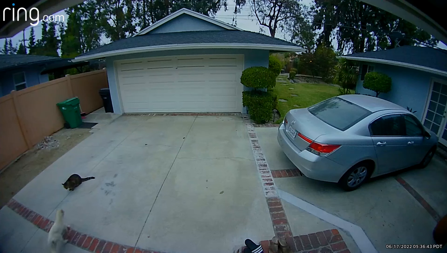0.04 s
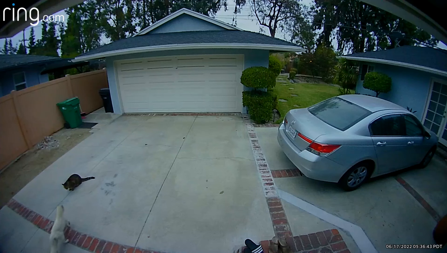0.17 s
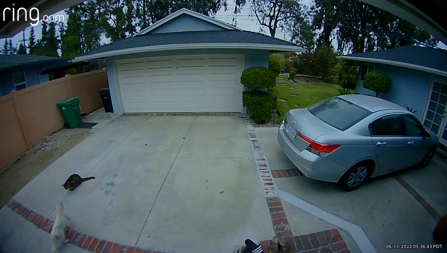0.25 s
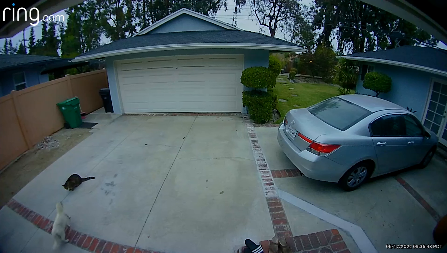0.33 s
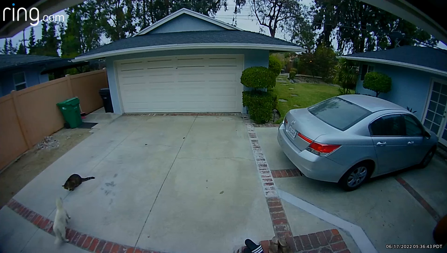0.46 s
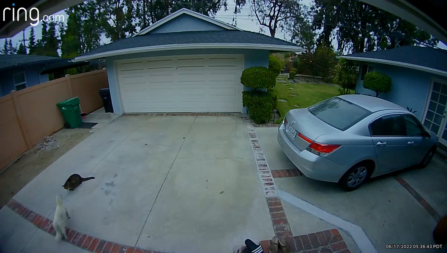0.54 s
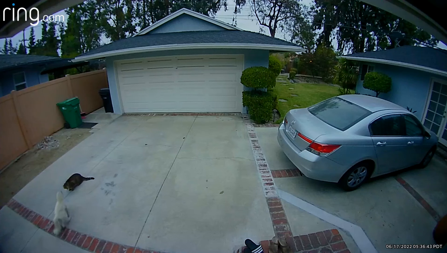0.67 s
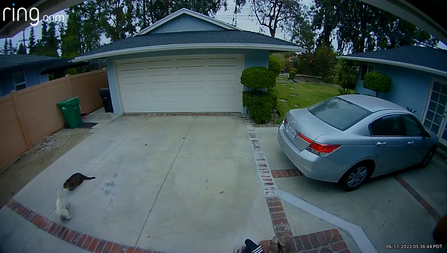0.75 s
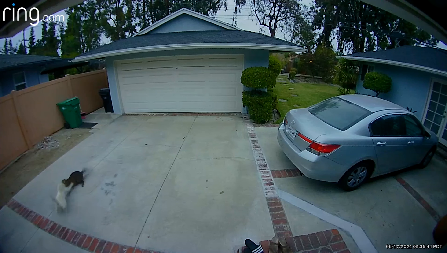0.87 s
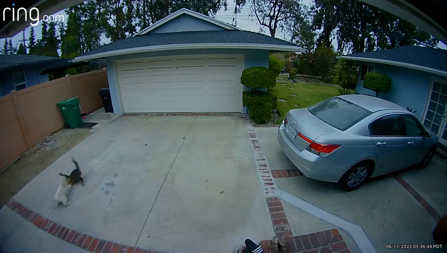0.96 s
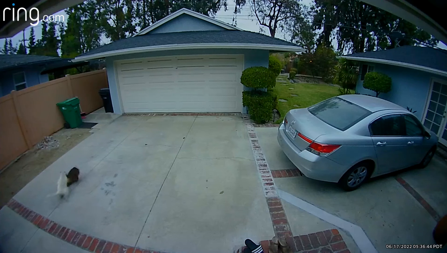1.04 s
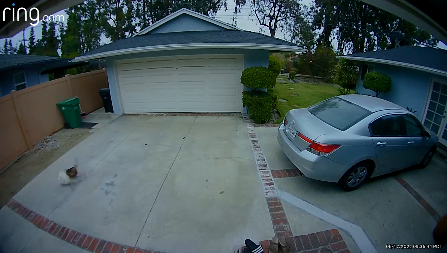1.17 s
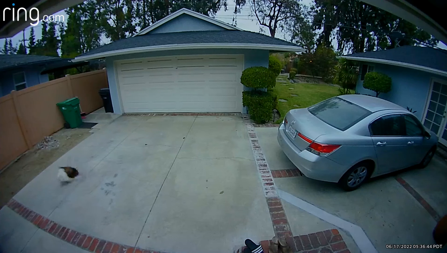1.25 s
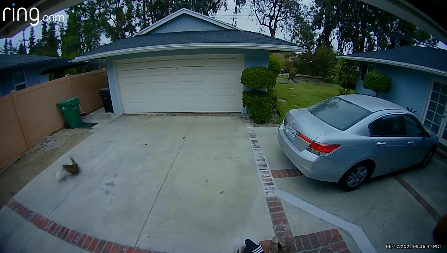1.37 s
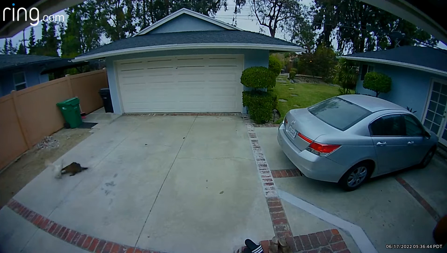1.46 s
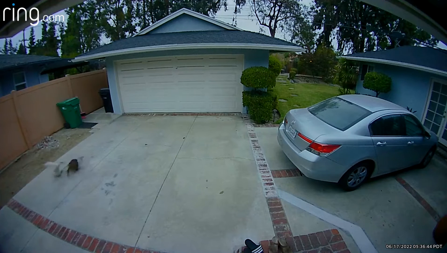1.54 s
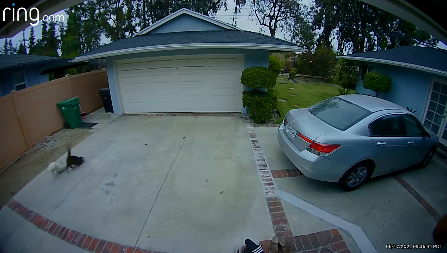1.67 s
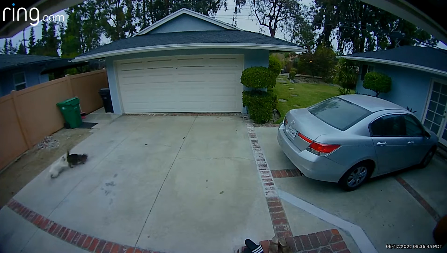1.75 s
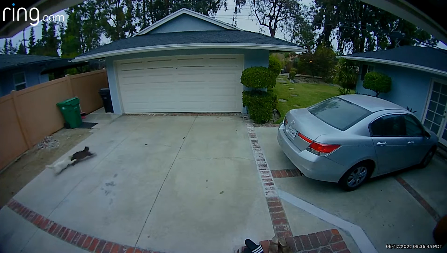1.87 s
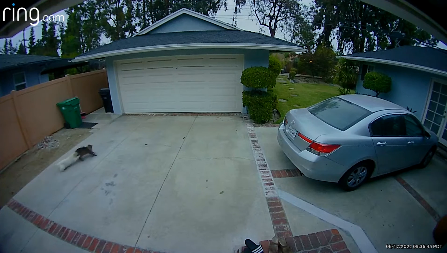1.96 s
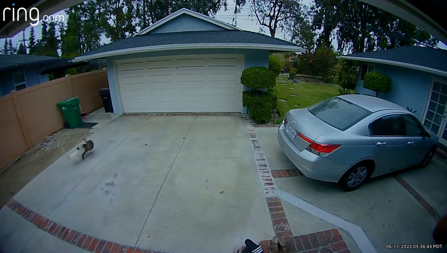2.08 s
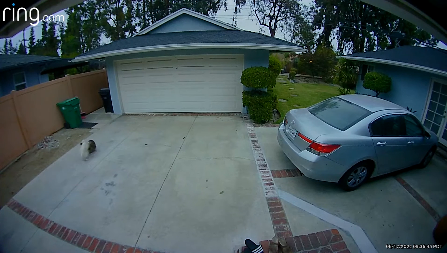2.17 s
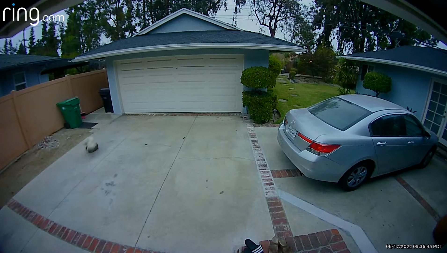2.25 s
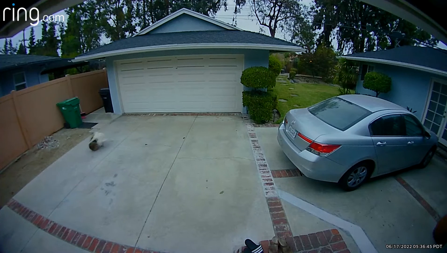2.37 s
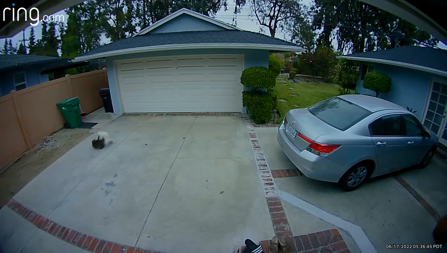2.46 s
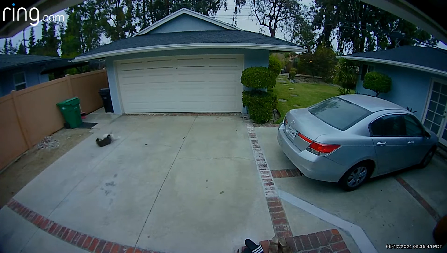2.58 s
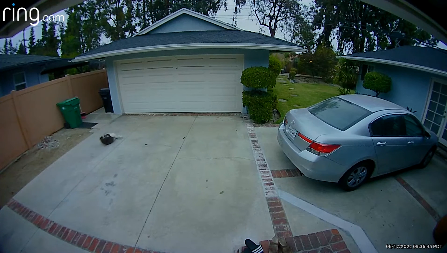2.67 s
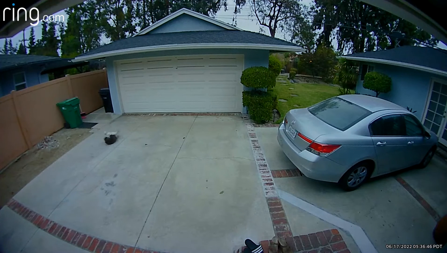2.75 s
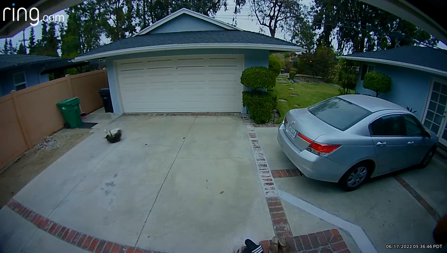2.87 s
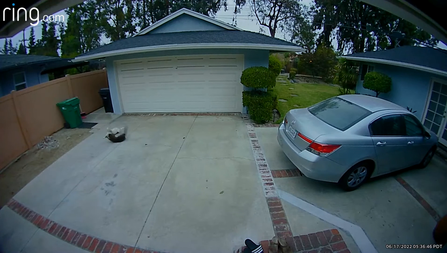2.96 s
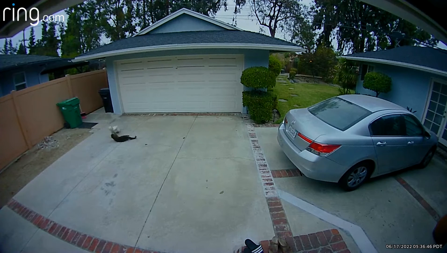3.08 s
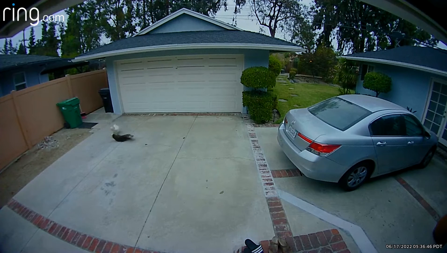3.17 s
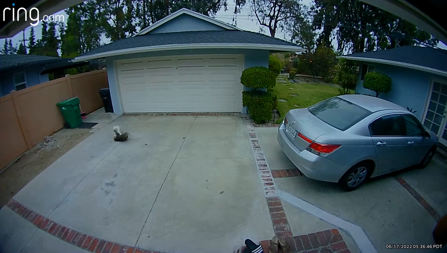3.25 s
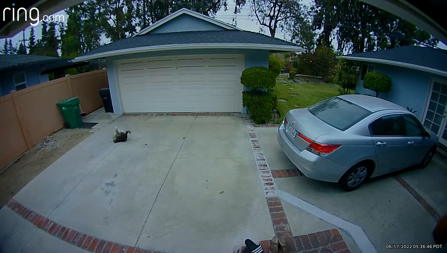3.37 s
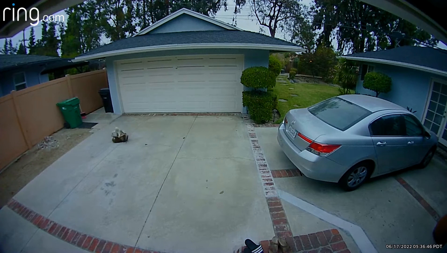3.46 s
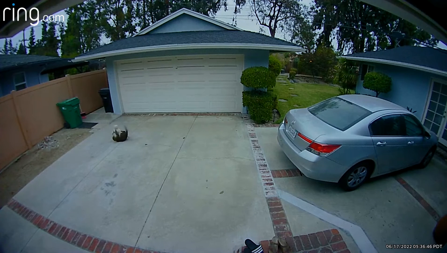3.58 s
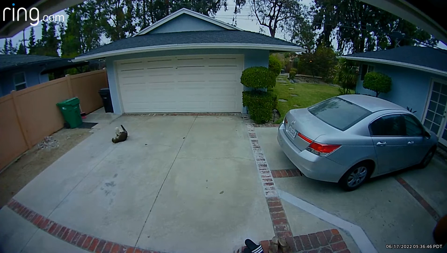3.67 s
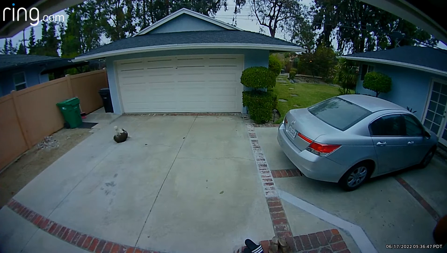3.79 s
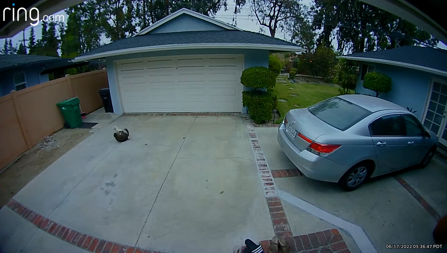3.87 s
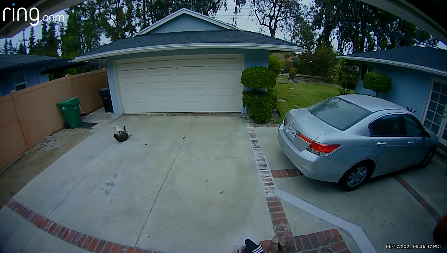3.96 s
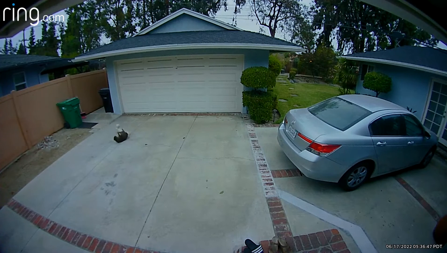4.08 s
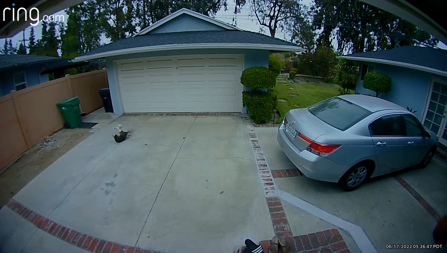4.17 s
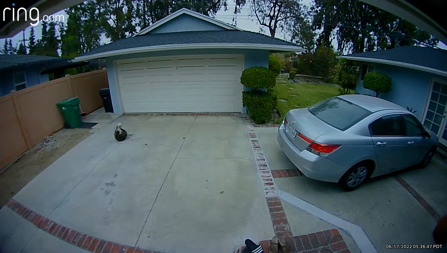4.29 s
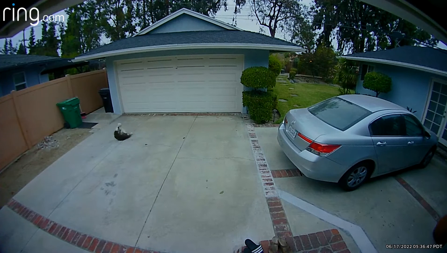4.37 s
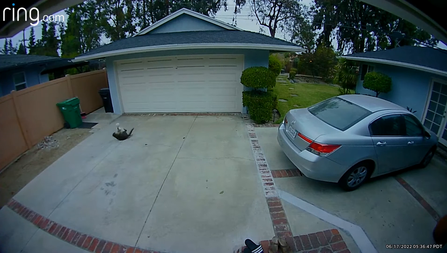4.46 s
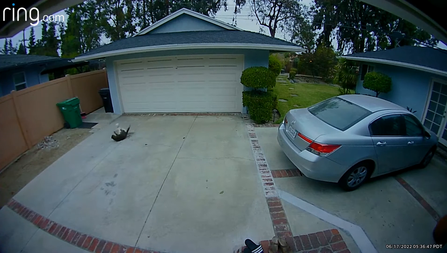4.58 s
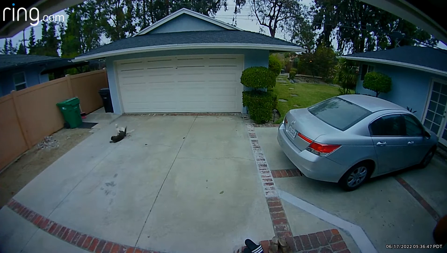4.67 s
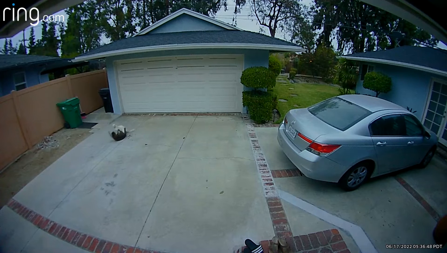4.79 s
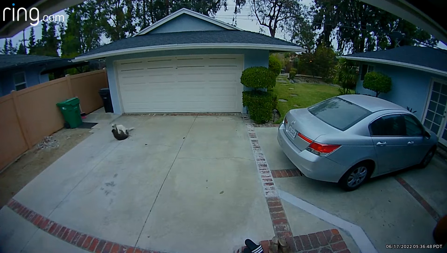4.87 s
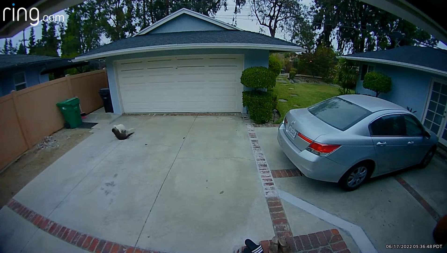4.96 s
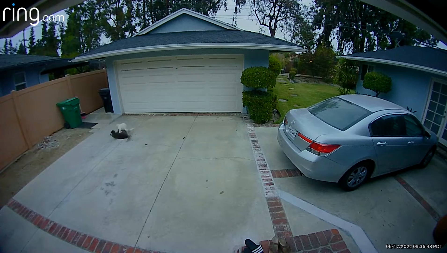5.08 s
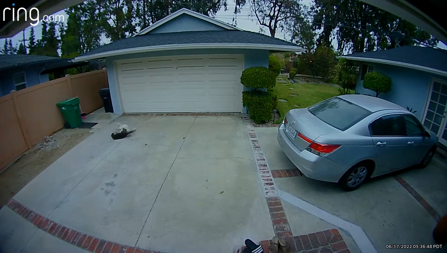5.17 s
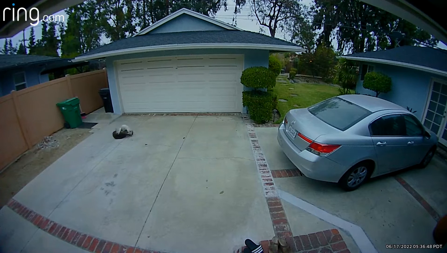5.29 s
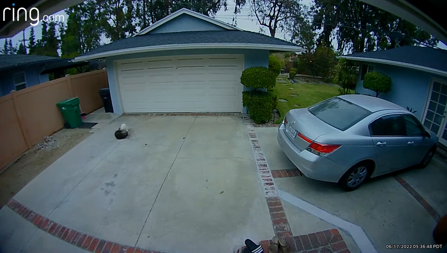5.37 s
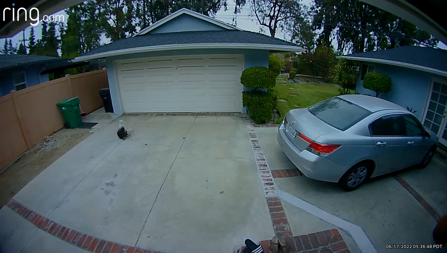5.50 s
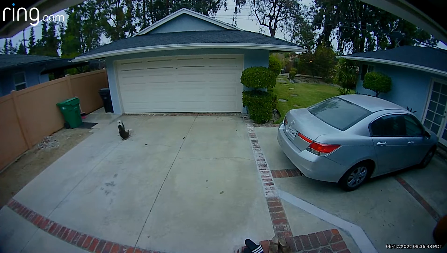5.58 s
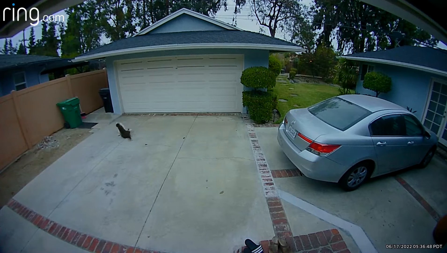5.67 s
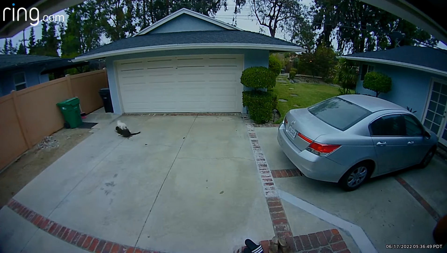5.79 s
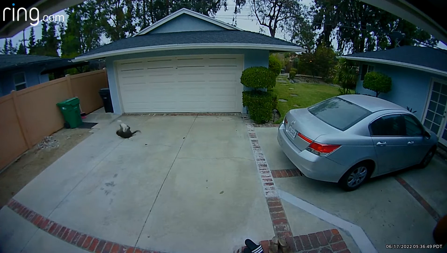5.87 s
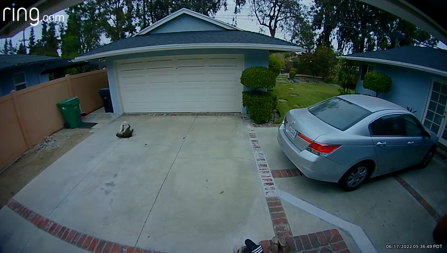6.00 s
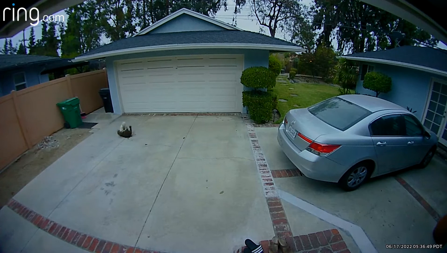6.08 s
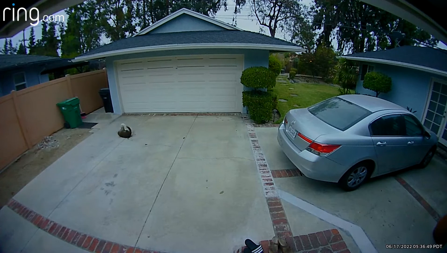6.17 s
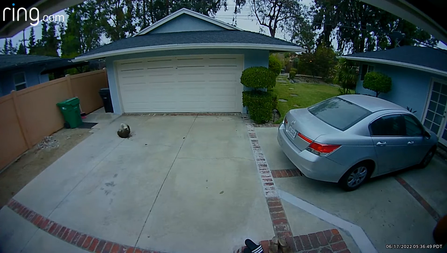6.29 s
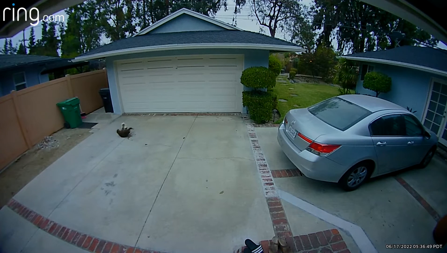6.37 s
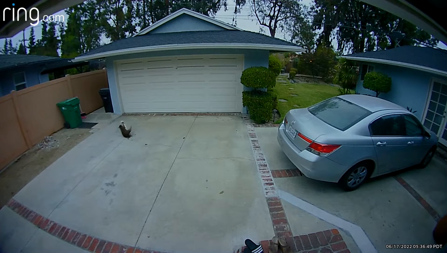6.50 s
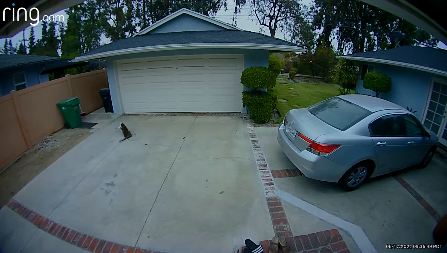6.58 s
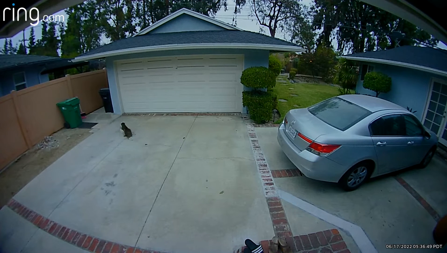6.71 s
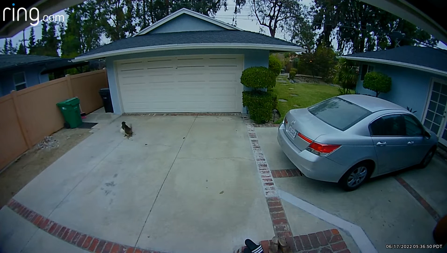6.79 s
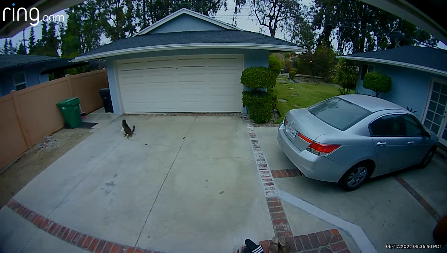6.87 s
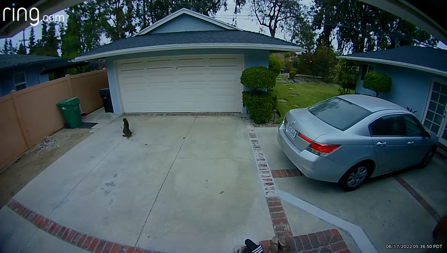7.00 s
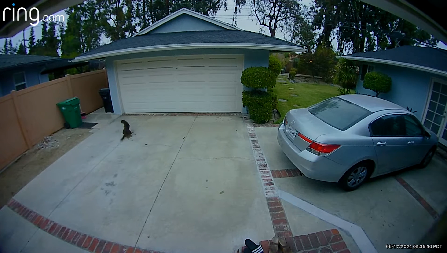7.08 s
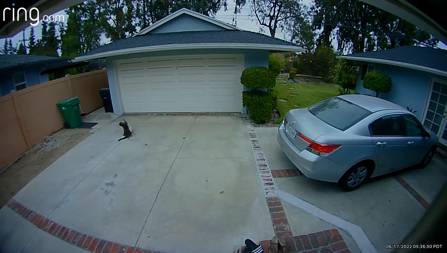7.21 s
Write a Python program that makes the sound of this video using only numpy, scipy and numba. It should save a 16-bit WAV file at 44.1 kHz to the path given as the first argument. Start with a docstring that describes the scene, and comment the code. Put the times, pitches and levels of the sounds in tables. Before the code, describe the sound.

Harsh, shrill screams from two fighting cats burst out in bouts outdoors, echoing off hard walls, with growls, claw scrapes and brief bird chips beforehand.

```python
"""Concrete driveway in front of a garage, heard by a security camera on the house: two cats fight.
A yowl climbs into a scream, a rival screams across it: rough pulse trains through throat resonances.
Snarls are short glides, hisses filtered noise, scuffles random scratches; a bird chips in falling sines.
Faint air, a thin tone, wall echoes; the microphone clips and the last bout crackles."""
import sys
import numpy as np
from scipy import signal
from scipy.fft import rfft, irfft, next_fast_len
from scipy.io import wavfile
from scipy.ndimage import uniform_filter1d, map_coordinates
from numba import njit

SR = 44100
rng = np.random.default_rng(int(sys.argv[2]) if len(sys.argv) > 2 else 0)


def generate_wav(signal):
    """Clip the signal to [-1, 1] and save it as 16-bit WAV at the path in sys.argv[1]."""
    frames = np.transpose(np.atleast_2d(signal))
    scaled = np.clip(frames, -1, 1) * 32767
    pcm = np.round(scaled).astype(np.int16)
    wavfile.write(sys.argv[1], SR, pcm)


N = 319283
TIME = np.arange(N) / SR

# leading cat's long cries: (start [s], end [s], attack [s], release [s], relative level [dB],
# open mouth resonance [Hz], mouth octaves per pitch octave, mouth closing [share/s],
# shrillness [dB], shrillness fall [dB/s])
LONG_CRIES = [(0.408, 0.692, 0.28, .02, -15, 2660, 0.51, 0, -16.5, -9),
              (0.665, 1.567, 0.041, .035, -10.5, 2540, 0.25, .1, 3.5, 20),
              (2.306, 3.483, 0.024, 0.09, -9, 2488, 0.97, 0.16, -9.5, 4),
              (3.742, 4.688, 0.037, 0.083, -6.5, 2197, 1.1, 0.01, -14, -2),
              (6.414, 7.3, 0.022, .03, -14.5, 2304, 1, .08, -13, 8)]
# its short snarls and moans, one glide each: (start [s], end [s], attack [s], release [s],
# relative level [dB], first pitch [Hz], last pitch [Hz], roughness [0-1])
SNARL_GLIDES = [(1.563, 1.632, 0.025, .03, -7.5, 830, 790, 0.52),
                (1.656, 1.809, 0.014, .06, -10, 722, 785, .55),
                (2.281, 2.336, 0.022, .025, -3.5, 599.5, 718.8, 0.4),
                (3.683, 3.784, 0.048, 0.033, -9.5, 650.6, 790, .7),
                (4.663, 4.837, 0.031, 0.069, -10.5, 764, 793.7, 0.39),
                (5.244, 5.436, 0.09, 0.11, -9.5, 671.6, 787.5, .8),
                (5.854, 6.1, 0.06, 0.098, -8.5, 690.1, 1030, 0.71),
                (6.268, 6.428, 0.071, 0.015, -12.5, 593.3, 700, .55)]


def undb(db):
    """Decibels to gain."""
    return 10 ** (np.asarray(db) / 20)


def curves(table):
    """Each column of a table, joined by straight lines in time."""
    s, *columns = np.transpose(table)
    return [np.interp(TIME, s, column) for column in columns]


def unit(x):
    """Scale to rms 1."""
    return x / np.sqrt(np.mean(x ** 2))


def steady(x, span_s=0.018):
    """Hold the short-term rms near 1."""
    power = uniform_filter1d(x ** 2, int(span_s * SR))
    return x / np.sqrt(power + 1e-12)


def colour(x, points):
    """Filter by a spectrum of (frequency [Hz], gain [dB]) points, joined on a log-frequency axis."""
    hz, db = np.transpose(points)
    size = next_fast_len(N + 8192)
    bins_hz = np.maximum(np.fft.rfftfreq(size, 1 / SR), 1)
    gain = undb(np.interp(np.log(bins_hz), np.log(hz), db))
    return irfft(rfft(x, size) * gain, size)[:N]


def walk(rate_hz):
    """Smooth random curve with about rate_hz new values a second, rms 1."""
    coarse_s = TIME[::16]
    values = rng.standard_normal(len(coarse_s))
    curve = map_coordinates(values, [coarse_s * rate_hz], order=2, mode="wrap")
    return unit(np.interp(TIME, coarse_s, curve))


def envelope(start_s, end_s, attack_s, release_s, bend=1.19):
    """Attack, hold at 1, release; both ramps follow a power law."""
    ramps = np.minimum((TIME - start_s) / attack_s, (end_s - TIME) / release_s)
    return np.clip(ramps, 0, 1) ** bend


@njit
def svf(x, hz, width_hz):
    """State-variable band-pass whose centre and width move."""
    y, band_state, low_state = np.empty(len(x)), 0., 0.
    for i in range(len(x)):
        g, k = np.tan(np.pi * hz[i] / SR), width_hz[i] / hz[i]
        v = (band_state + g * (x[i] - low_state)) / (1 + g * (g + k))
        band_state = 2 * v - band_state
        low_state += 2 * g * v
        y[i] = k * v
    return y


def band(hz, width_hz, size):
    """Turbulent air: white noise through two equal resonances in series, rms 1."""
    centre, width = np.full(size, float(hz)), np.full(size, float(width_hz))
    once = svf(rng.standard_normal(size), centre, width)
    return unit(svf(once, centre, width))


def outdoor_air(level_db=-60.5):
    """Quiet outdoor air: coloured noise whose level wanders."""
    # air spectrum: (frequency [Hz], gain [dB])
    air_spectrum = [(30, -36.5), (130, -19), (250, -4), (450, -12), (1000, -12), (1400, -15.5), (4900, -19),
                    (5300, 0), (5800, 2), (6400, -9), (6900, -29.5), (9000, -46.5)]
    return unit(colour(rng.standard_normal(N), air_spectrum)) * undb(level_db + walk(10))


def thin_tone(hz=3490, level_db=-47, fade_s=0.031):
    """A faint sine with a wandering phase lingers in the lull after the third bout."""
    # extent of the tone: (start [s], end [s])
    tone_span = (4.93, 5.26)
    tone = np.sin(2 * np.pi * hz * TIME + walk(33))
    return undb(level_db) * envelope(*tone_span, fade_s, fade_s) * tone


def bird(length_s=0.022):
    """Bird chips: short sines that fall in pitch, with a quick attack."""
    # chips: (start [s], first pitch [Hz], fall in pitch [Hz], relative level [dB])
    chips = [(0, 5800, 83, -50), (0.108, 5560, 37, -54), (0.129, 5540, 160, -43.5),
             (0.279, 5920, 530, -35.5), (0.313, 5600, 19, -53.5), (.412, 5650, 40, -50),
             (0.432, 5970, 470, -34)]
    out, t = np.zeros(N), TIME[:int(length_s * SR)]
    shape = np.sin(np.pi * np.sqrt(t / length_s))
    for start_s, hz, fall_hz, db in chips:
        phase = 2 * np.pi * np.cumsum(hz - fall_hz * t / length_s) / SR
        out[max(int(start_s * SR), 0):][:len(t)] += undb(db) * np.sin(phase) * shape
    return out


def scuffle(rate_hz=140, level_db=-43, scrape_s=0.0049):
    """Claws and bodies on concrete: random scratches with decaying pressure drive coloured noise."""
    # fur and claws on concrete: (frequency [Hz], gain [dB])
    concrete = [(100, -37.5), (230, 0.5), (380, 1), (600, 2.5), (900, 0.5), (3200, -2), (4500, -15),
                (6000, -0.5), (7200, -35)]
    # spells of grappling: (start [s], end [s], vigour [dB])
    tussles = [(0.789, 1.301, 23.5), (1.22, 2.235, 3), (2.315, 3.567, 4), (3.681, 3.998, -7.5),
               (3.94, 5.159, 4), (5.276, 5.638, 12), (5.622, 6.22, 0), (6.24, 7.294, 4)]
    attack_s, release_s = 0.063, 0.093
    scratches = (rng.random(N) < rate_hz / SR) * rng.standard_normal(N)
    decay = np.exp(-TIME[:SR // 20] / scrape_s)
    pressure = signal.fftconvolve(scratches, decay)[:N]
    contact = colour(pressure * rng.standard_normal(N), concrete)
    vigour = sum(undb(db) * envelope(start_s, end_s, attack_s, release_s)
                 for start_s, end_s, db in tussles)
    return unit(contact) * undb(level_db) * vigour


def spits(rattle_db=-0.5, chest_db=-8):
    """Bursts of air: a rattling growl low in the throat, a rasp in the mouth, a hiss at the teeth."""
    # growling spits and hisses: (start [s], length [s], growl relative level [dB], growl [Hz],
    # rasp relative level [dB], rasp [Hz], hiss relative level [dB])
    bursts = [(1.877, 0.059, -38, 1480, -34, 3140, -42), (1.95, 0.067, -26.5, 1157, -30.5, 3190, -30),
              (2.094, 0.056, -17.5, 1409, -26.5, 2430, -23.5),
              (2.125, 0.042, -31, 1280, -22.5, 3065, -27.5),
              (2.175, 0.028, -35.5, 1306, -46.5, 2992, -29.5), (4.919, 0.096, -32, 1320, -31, 3435, -36),
              (4.965, 0.056, -22, 1220, -32, 3370, -33.5), (5.024, 0.057, -24, 1104, -34.5, 3350, -32),
              (5.326, 0.074, -37.5, 1446, -28, 2480, -28), (5.411, 0.098, -41, 1446, -33, 2640, -33),
              (5.495, 0.083, -43, 1290, -35.5, 2342, -35), (5.596, 0.085, -43, 1370, -39.5, 2370, -48),
              (5.705, 0.029, -39, 1242, -49.5, 2201, -57), (5.733, 0.057, -33, 1165, -40, 2210, -41),
              (6.283, 0.13, -17.5, 1153, -26, 2412, -55)]
    out, rattle = np.zeros(N), undb(rattle_db * (walk(180) - 2.5))
    for start_s, length_s, growl_db, growl_hz, rasp_db, rasp_hz, hiss_db in bursts:
        size = int(length_s * SR)
        growl = undb(growl_db) * band(growl_hz, 410, size)
        rasp = undb(rasp_db) * band(rasp_hz, 430, size)
        hiss = undb(hiss_db) * band(5913, 1400, size)
        chest = undb(chest_db + (growl_db + hiss_db) / 2) * band(310, 230, size)
        burst = (growl + rasp + hiss + chest) * signal.windows.tukey(size, .7)
        out[int(start_s * SR):][:size] += burst
    return out * rattle


def effort(hz, open_pitch_hz=965):
    """Octaves from the pitch at which the mouth is wide open: negative below it, 0 from there up."""
    return np.log2(np.minimum(hz / open_pitch_hz, 1))


def lead_controls(snarl_mouth_ratio=2.18, snarl_shrill_db=-14.5, shrill_db_per_octave=24):
    """Leading cat's pitch, roughness, mouth and shrillness: the mouth opens with effort, closes as it tires."""
    # courses of the long cries in turn: (time [s], pitch [Hz], roughness [0-1])
    yowl = [(0.412, 497, 0.07), (0.452, 527, 0.15), (.48, 612.1, .09), (0.519, 740, 0.04),
            (0.602, 695, .06), (0.68, 737, 0.02)]
    first_scream = [(0.687, 682.7, 0.096), (.76, 764, 0.2), (.80, 817.3, 0.22), (.84, 1014, .28),
                    (.95, 1147, 0.34), (0.999, 1268, .32), (1.09, 1286, 0.62), (1.22, 1328, 0.59),
                    (1.28, 1118, 0.494), (1.35, 1221, 0.39), (1.44, 913, 0.51), (1.551, 836, 0.53)]
    second_scream = [(2.345, 787.5, 0.89), (2.38, 987.5, 0.43), (2.44, 973, 0.43), (2.49, 1043, 0.39),
                     (2.54, 882.6, 0.184), (2.659, 1125, .33), (2.78, 926, .36), (2.849, 943.4, .27),
                     (2.93, 931, 0.36), (2.97, 844, 0.32), (3.04, 846, 0.26), (3.118, 913.4, 0.395),
                     (3.2, 851, 0.35), (3.35, 890.4, 0.29), (3.40, 760.7, 0.19), (3.46, 761.7, 0.23)]
    third_scream = [(3.8, 1150, 0.37), (3.86, 1212, 0.36), (3.94, 1126, 0.62), (4.04, 1110, 0.52),
                    (4.10, 1064, 0.36), (4.16, 955.7, 0.29), (4.25, 953.2, .45), (4.33, 889.4, 0.31),
                    (4.39, 797.6, .16), (4.479, 779, 0.232), (4.52, 857, 0.405), (4.591, 1093, .36),
                    (4.66, 1067, 0.45)]
    last_scream = [(6.441, 805.4, 0.14), (6.551, 784.7, .42), (6.662, 840.7, 0.44), (6.739, 772.7, .18),
                   (6.82, 794, 0.36), (6.92, 766.8, .2), (7.02, 804.8, 0.39), (7.101, 817, .14),
                   (7.18, 787.4, 0.3), (7.24, 847, 0.16)]
    courses = (yowl, first_scream, second_scream, third_scream, last_scream)
    points = []
    for cry, course in zip(LONG_CRIES, courses):
        start_s, *_, open_hz, follows, closing, shrill_db, dulling = cry
        for s, hz, rough in course:
            age_s = s - start_s
            mouth_hz = open_hz * 2 ** (follows * effort(hz)) * (1 - closing * age_s)
            points.append((s, hz, rough, mouth_hz, shrill_db - dulling * age_s))
    for start_s, end_s, *_, first_hz, last_hz, rough in SNARL_GLIDES:
        for s, hz in ((start_s, first_hz), (end_s, last_hz)):
            # a snarling mouth rings just above the second harmonic
            points.append((s, hz, rough, snarl_mouth_ratio * hz, snarl_shrill_db))
    hz, rough, mouth_hz, shrill_db = curves(sorted(points))
    return hz, rough, mouth_hz, shrill_db + shrill_db_per_octave * effort(hz)


def rival_controls(sag=.16, fade_s=0.047):
    """Rival's pitch and relative gain: each cry rises to its top and sinks by the share sag."""
    # the rival's arching cries: (start [s], end [s], top pitch [Hz], level against the lead [dB])
    rival_cries = [(.8, 1.42, 1031, -5), (1.4, 1.55, 859, 5), (1.64, 1.8, 527.7, 4.5),
                   (2.32, 2.48, 762, -1), (2.56, 2.8, 964.5, 1.5), (2.78, 3.4, 777.5, -7),
                   (3.9, 4.38, 816.8, 0.5), (4.48, 4.63, 838, 5.5), (5.28, 5.45, 638.7, -5.5),
                   (5.92, 6.14, 771.6, -12), (6.42, 6.68, 808.3, 5.5), (6.74, 7.12, 710.7, 2)]
    hz, gain = np.full(N, float(rival_cries[0][2])), 0
    for start_s, end_s, top_hz, db in rival_cries:
        from_middle = np.clip(2 * (TIME - start_s) / (end_s - start_s) - 1, -1, 1)
        hz = np.where(TIME > start_s, top_hz * (1 - sag * from_middle ** 2), hz)
        gain = gain + undb(db) * envelope(start_s, end_s, fade_s, fade_s)
    return hz, gain


def larynx(hz, rough, jitter=.05, quaver=.035, wobble=.03, flutter=0.67, doubling=0.85, rush=1.0,
           slope=0.27, tear_db=9):
    """Vocal folds: strain makes cycles uneven, tears harmonics, doubles the period, lets air rush through."""
    unevenness = jitter * walk(700) + quaver * walk(110) + wobble * walk(35)
    hz = hz * (1 + rough * unevenness)
    phase = 2 * np.pi * np.cumsum(hz) / SR
    tearing_db = tear_db * np.minimum(rough, .5)
    harmonics = sum(np.sin(k * phase) / k ** slope * undb(tearing_db * walk(45)) for k in range(1, 10))
    pulses = steady(harmonics)
    strong_weak = 1 + doubling * rough * (1 + walk(25)) * np.cos(phase / 2)
    air = rng.standard_normal(N) * (1 + np.cos(phase))
    return (pulses * strong_weak + rush * rough * air) * (1 + flutter * rough * walk(320))


def voice(hz, rough, mouth_hz, shrill_db, narrow_hz=400, damping_hz=1700, leak=0.0027, strain_leak=0.16):
    """A clean cry rings one sharp mouth resonance; strain widens it, and force adds a shrill top."""
    # wide open throat: (frequency [Hz], gain [dB])
    throat = [(150, -14.5), (300, 1), (550, -11), (850, 6.5), (1300, 4.5), (2000, -0.5), (3000, -1),
              (3700, -5.5), (4400, -31.5), (5500, -30), (8000, -48.5)]
    # shrill top: (frequency [Hz], gain [dB])
    shrill = [(2800, -25), (3800, 1.5), (4600, -4), (5400, 1), (6200, 2), (6700, -0.5), (8000, -10.5),
              (10000, -31.5)]
    folds = larynx(hz, rough)
    # a gaping mouth rings less and lets more through
    gape = np.minimum(rough, .5) * (mouth_hz / 2000) ** 1.55
    width_hz = narrow_hz + damping_hz * gape
    ringing = svf(svf(folds, mouth_hz, width_hz), mouth_hz, width_hz)
    body = ringing + (leak + strain_leak * gape) * folds
    return steady(colour(body, throat)) + undb(shrill_db) * steady(colour(folds, shrill))


def screams(gain_db=1.0, rival_rough=.52, rival_mouth=1.024, jaw=0.16, surge_db=4.0,
            force_db_per_octave=6.5):
    """Both cats cry at once, bout after bout; the struggle shakes their jaws and jolts their force."""
    lead_hz, rough, mouth_hz, shrill_db = lead_controls()
    rival_hz, rival_gain = rival_controls()
    force = sum(undb(db) * envelope(start_s, end_s, attack_s, release_s)
                for start_s, end_s, attack_s, release_s, db, *_ in LONG_CRIES + SNARL_GLIDES)
    shake = jaw * np.minimum(rough, .5)
    lead = voice(lead_hz, rough, mouth_hz * (1 + shake * walk(30)), shrill_db)
    rival_mouth_hz = rival_mouth * mouth_hz * (1 + shake * walk(30))
    rival = voice(rival_hz, rival_rough, rival_mouth_hz, shrill_db)
    both = (lead + rival_gain * rival) / np.sqrt(1 + rival_gain ** 2)
    level_db = gain_db + force_db_per_octave * effort(lead_hz) + surge_db * rough * walk(30)
    return both * force * undb(level_db)


def driveway(x, t60_s=0.5, tail_db=-13, drift_s=0.0004073):
    """Hard reflections whose paths shift as the cats roll, plus a short noise tail between the houses."""
    # garage door, fence, house front: (mean delay [s], relative level [dB])
    walls = [(.0047, -12), (0.0124, -10), (.021, -12.5), (.034, -9)]
    # the cats tumble away from the camera towards the garage: (time [s], relative echo level [dB])
    retreat = [(.7, -2), (1.2, -3), (2.7, 3)]
    t = TIME[:SR]
    response = rng.standard_normal(SR) * undb(-60 * t / t60_s) * np.minimum(t / 0.035, 1)
    echo = undb(tail_db) * signal.fftconvolve(x, response / np.linalg.norm(response))[:N]
    for delay_s, db in walls:
        echo += undb(db) * np.interp(TIME - delay_s - drift_s * walk(3), TIME, x)
    echo_db, = curves(retreat)
    echo_power_ratio = np.mean(echo ** 2) / np.mean(x ** 2)
    # more echo means less direct sound
    return (x + undb(echo_db) * echo) / np.sqrt(1 + undb(2 * echo_db) * echo_power_ratio)


def crackle(rate_hz=2800, sputter_db=2.5, lurch_db=1.2, fade_db_per_s=5.5):
    """Dense random clicks that sputter and lurch over the last bout; each burst slowly fades."""
    # bursts of crackle: (start [s], end [s], relative level at the start [dB])
    crackles = [(6.362, 6.418, -15), (6.419, 7.2, -12), (7.199, 7.3, -14)]
    # click spectrum: (frequency [Hz], gain [dB])
    crackle_spectrum = [(25, -7), (200, -3.5), (3000, -5), (6000, -5.5), (7900, -7.5), (8400, -19),
                        (9000, -28), (11500, -35), (13000, -53)]
    attack_s, release_s = 0.038, 0.018
    bursts = sum(undb(db - fade_db_per_s * (TIME - start_s)) * envelope(start_s, end_s, attack_s, release_s)
                 for start_s, end_s, db in crackles)
    density = rate_hz / SR * undb(2 * (sputter_db * walk(170) + lurch_db * walk(35)))
    clicks = (rng.random(N) < density) * rng.choice([-1, 1], N)
    return unit(colour(clicks, crackle_spectrum)) * bursts


def scene():
    """Cats and bird echo on the driveway; thin tone and quiet air are added dry, same in both channels."""
    echoing = driveway(screams() + spits() + scuffle() + bird())
    return np.tile(echoing + thin_tone() + outdoor_air(), (2, 1))


def record(dry, ceiling=0.46, lopsided=0.0095, top_hz=12400):
    """The camera drops the bass, clips a little unevenly, dulls the treble and crackles."""
    # the camera's response: (frequency [Hz], gain [dB])
    mic = [(5, -37), (20, 4), (6200, -1), (6900, -11), (8200, -15.5), (8500, -25), (9000, -26.5),
           (9400, -69), (20000, -95)]
    x = signal.sosfilt(signal.butter(3, 190, "high", fs=SR, output="sos"), dry[0])
    clipped = np.clip(x, -ceiling - lopsided, ceiling - lopsided)
    x = np.clip(colour(clipped, mic) + crackle(), -.65, .65)
    low_pass = signal.ellip(8, .2, 70, top_hz, fs=SR, output="sos")
    return np.tile(signal.sosfilt(low_pass, x), (2, 1))


dry = scene()
out = record(dry)
generate_wav(out)
```